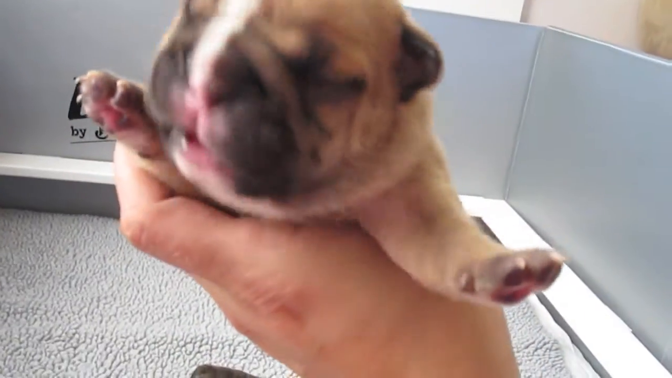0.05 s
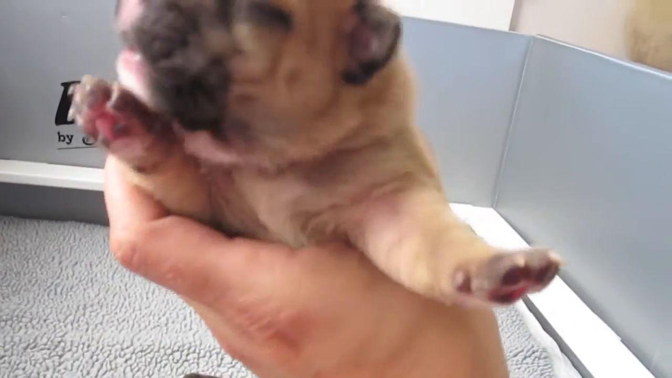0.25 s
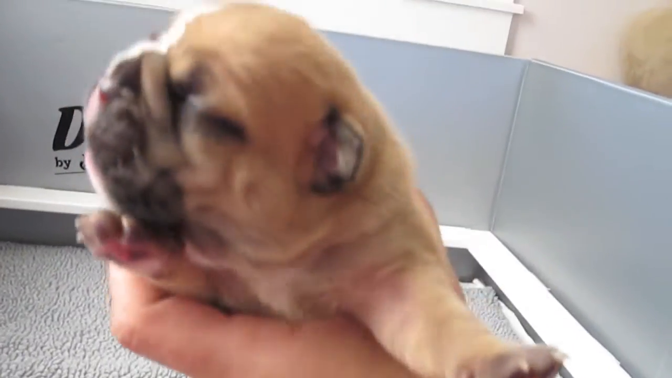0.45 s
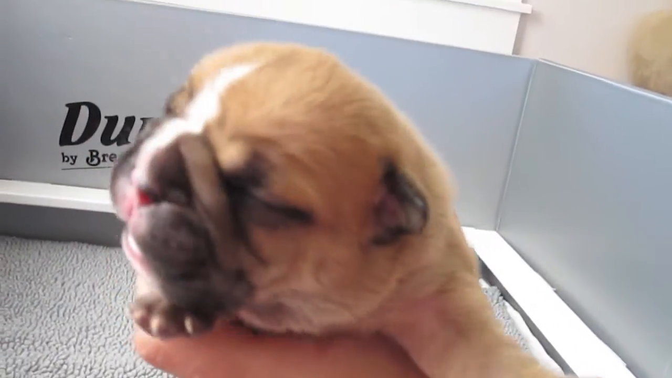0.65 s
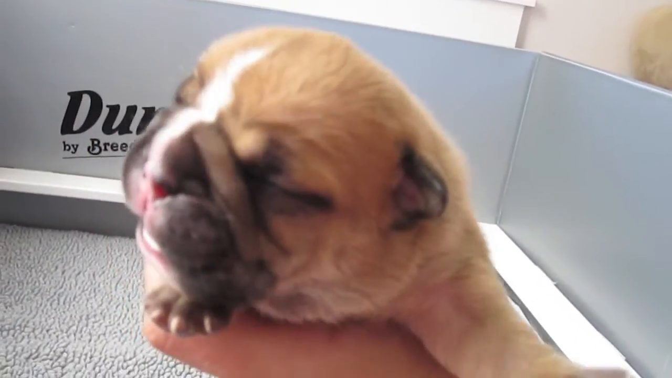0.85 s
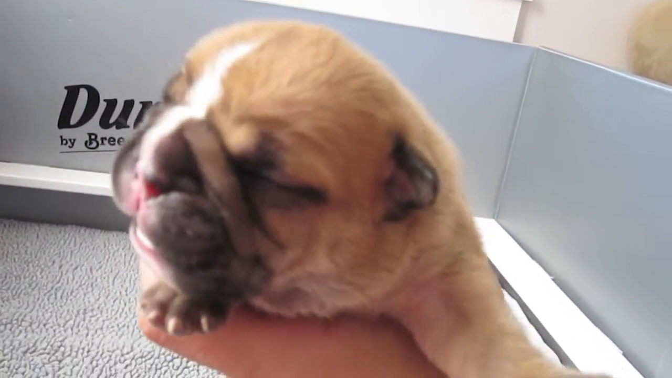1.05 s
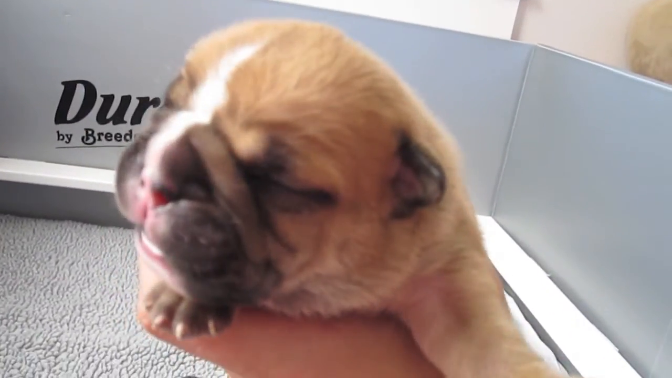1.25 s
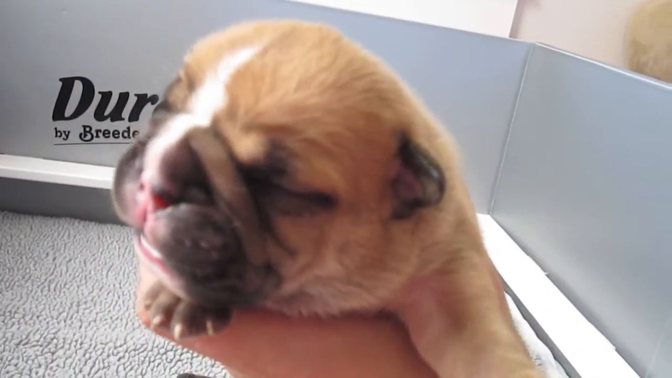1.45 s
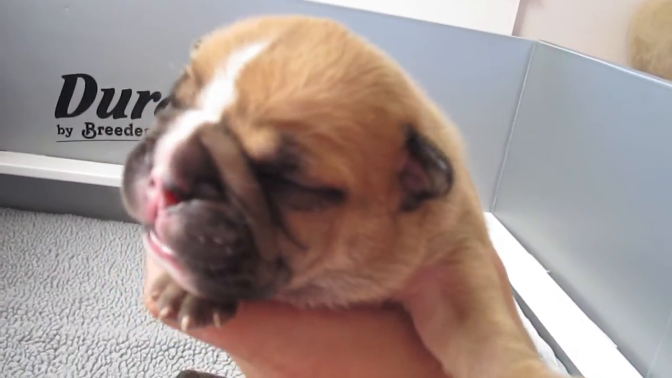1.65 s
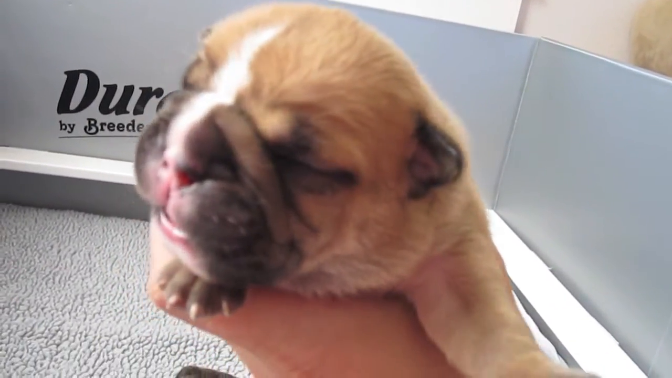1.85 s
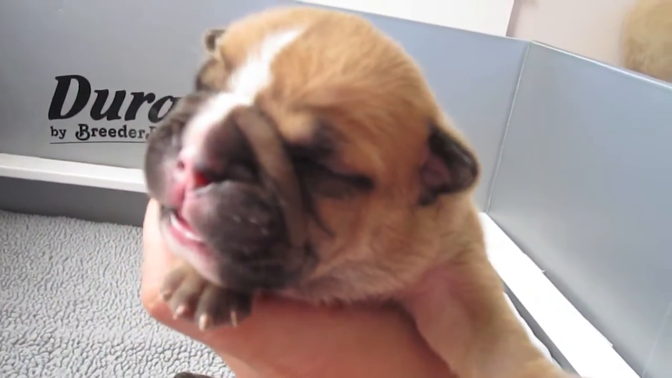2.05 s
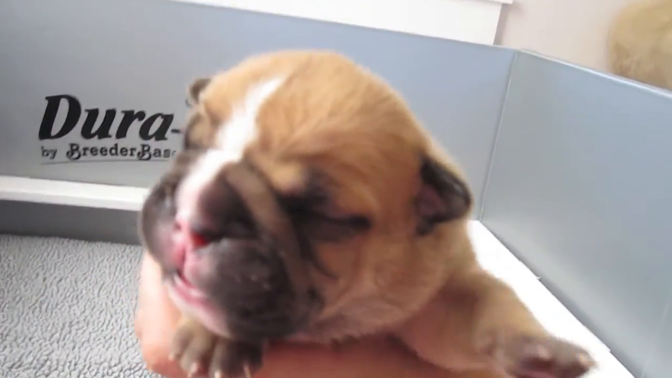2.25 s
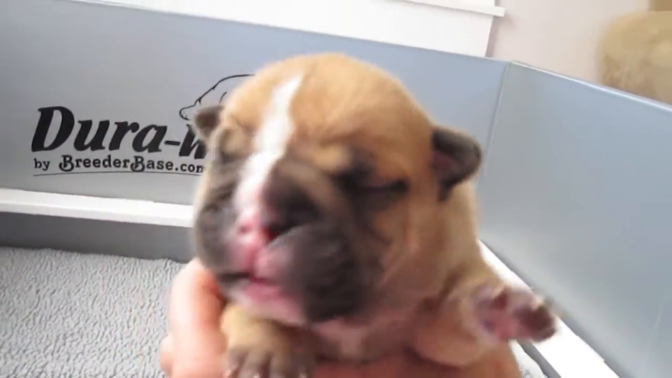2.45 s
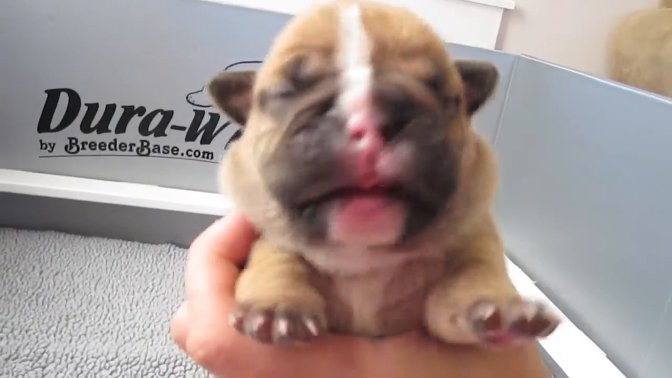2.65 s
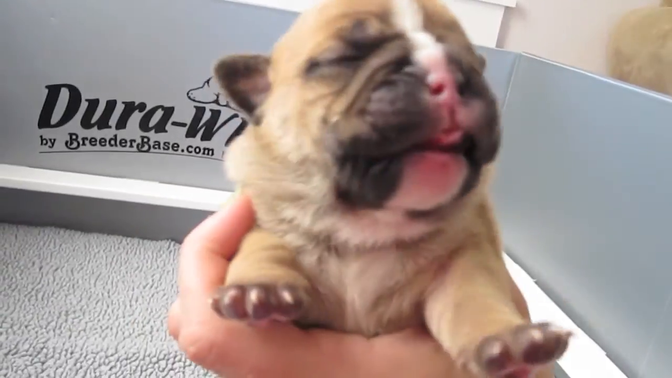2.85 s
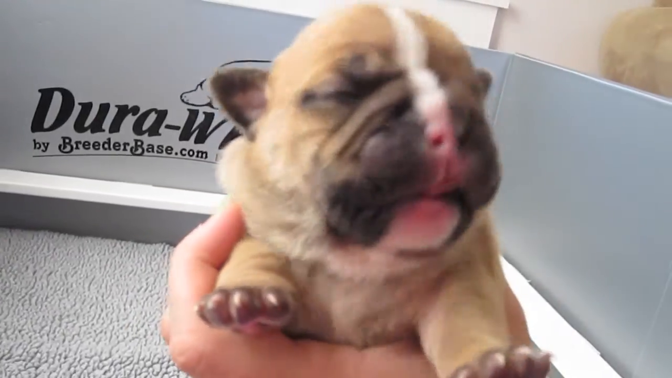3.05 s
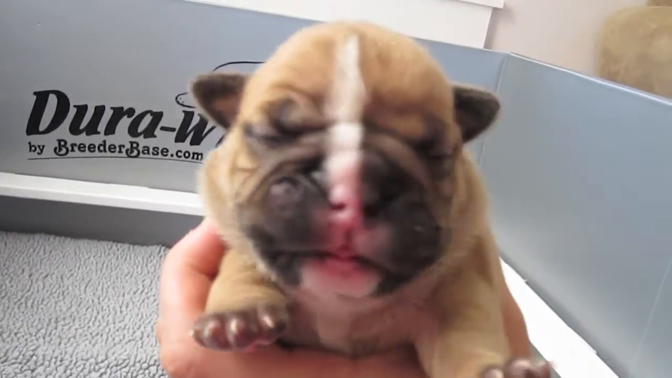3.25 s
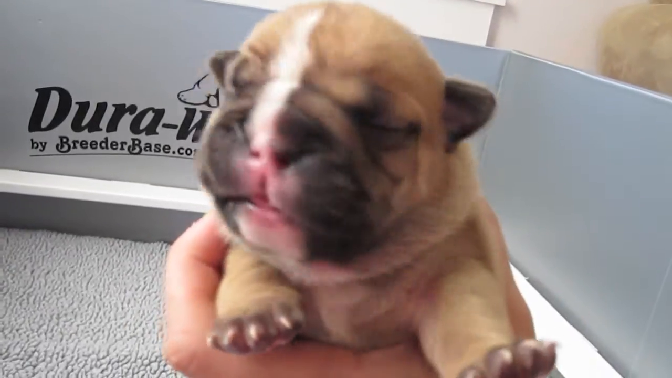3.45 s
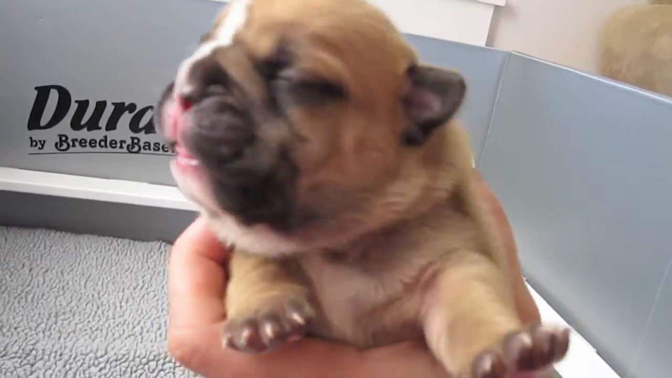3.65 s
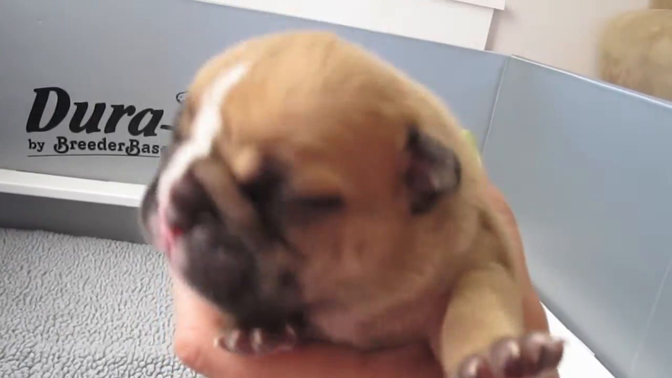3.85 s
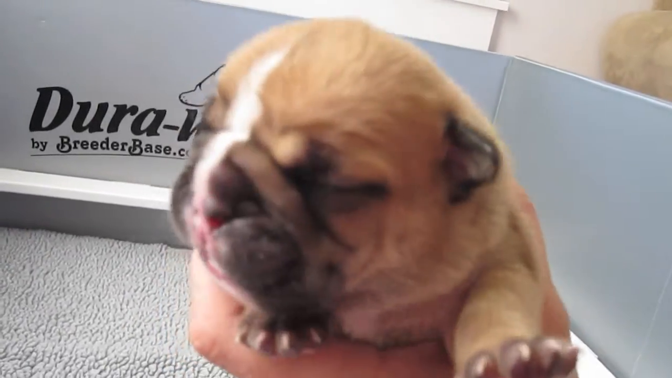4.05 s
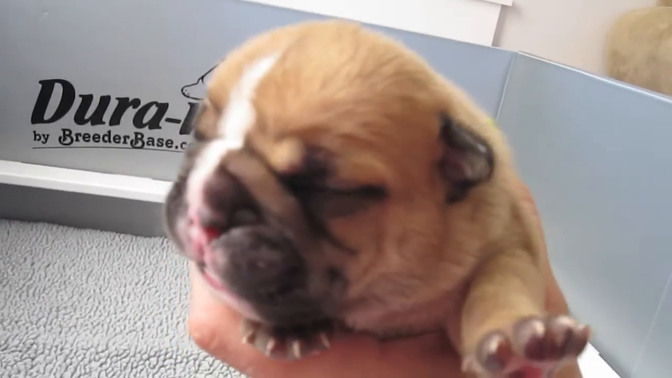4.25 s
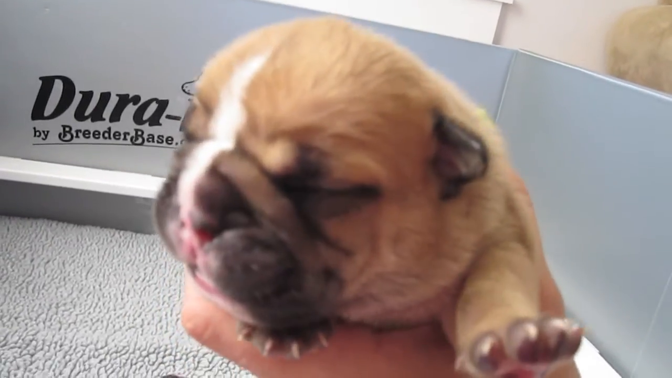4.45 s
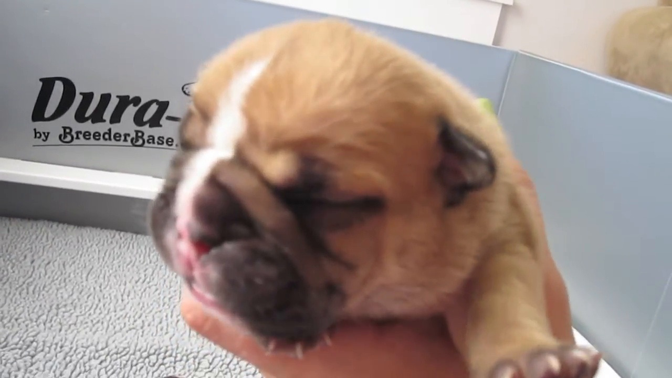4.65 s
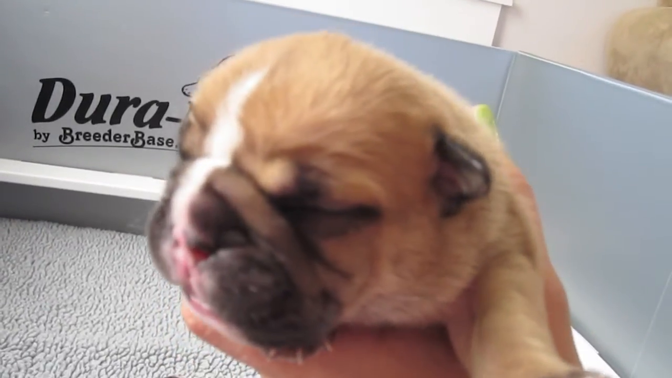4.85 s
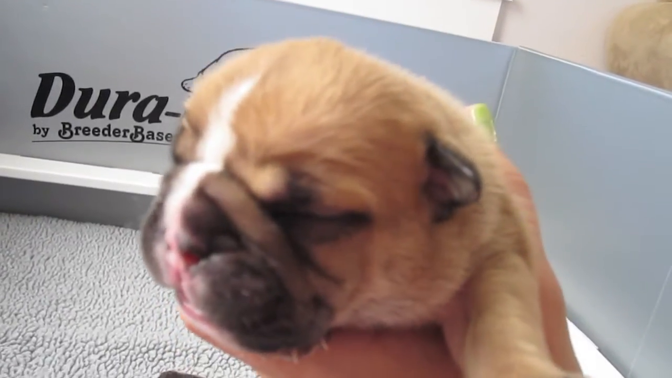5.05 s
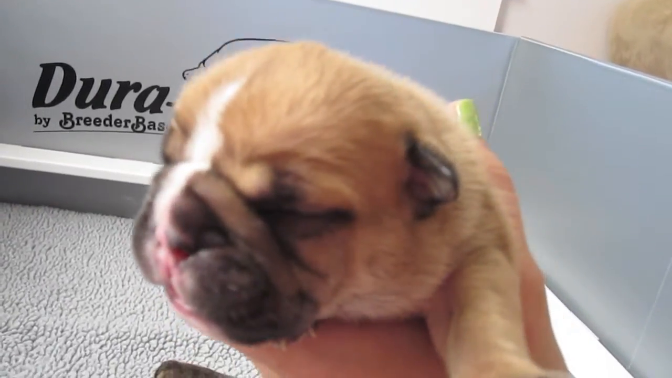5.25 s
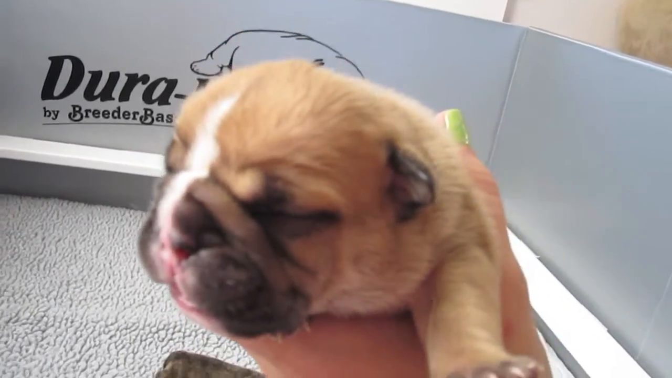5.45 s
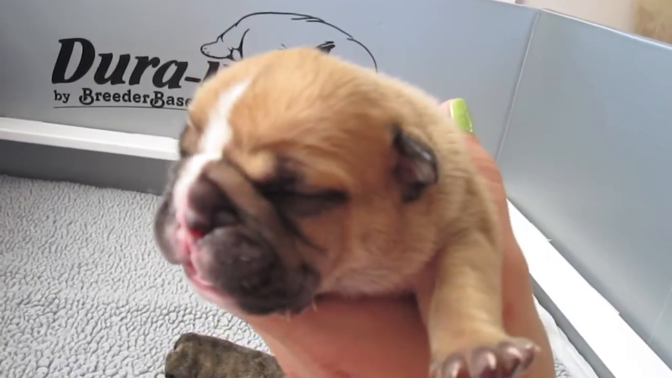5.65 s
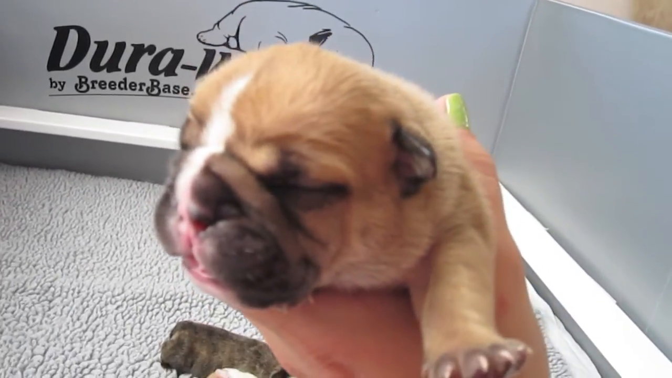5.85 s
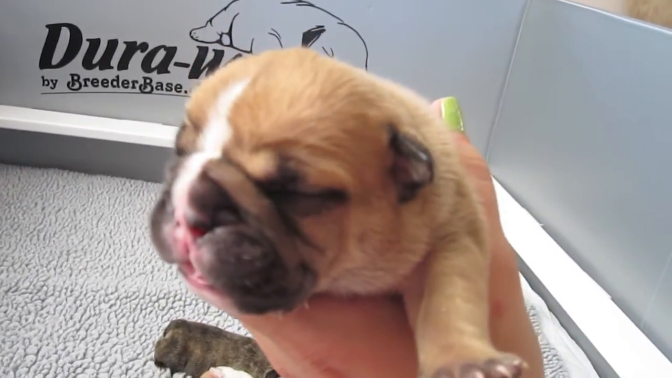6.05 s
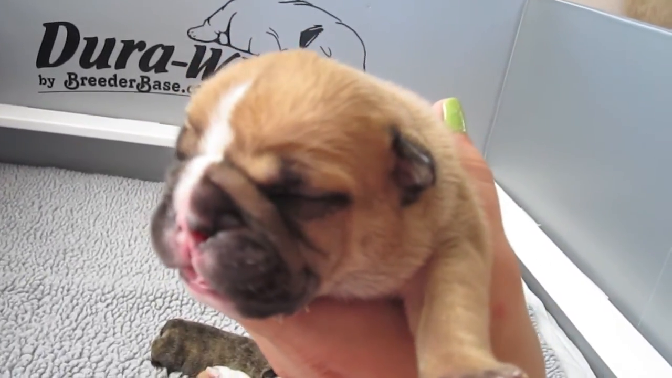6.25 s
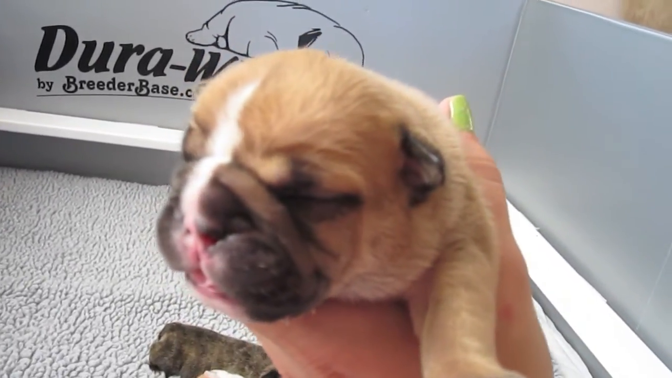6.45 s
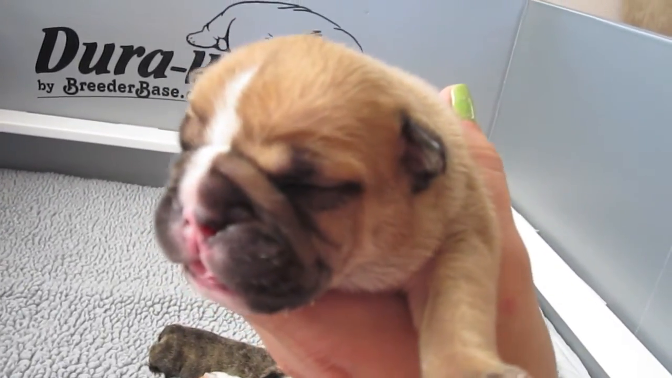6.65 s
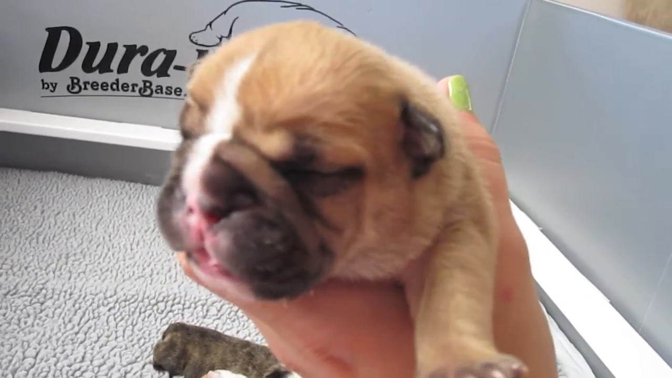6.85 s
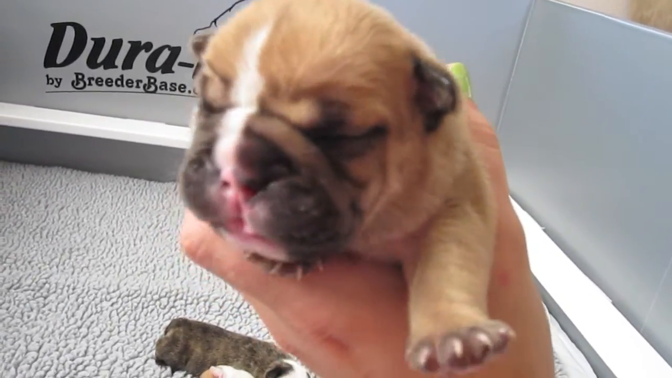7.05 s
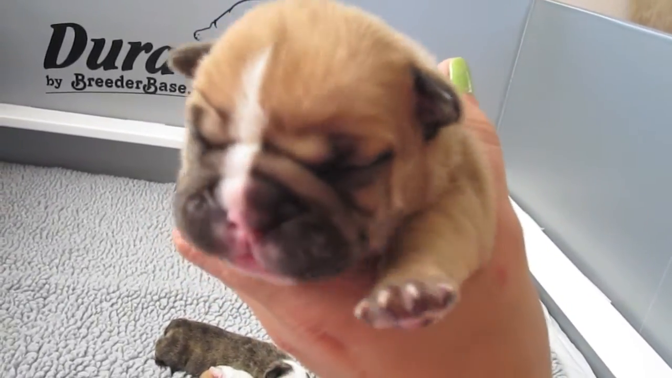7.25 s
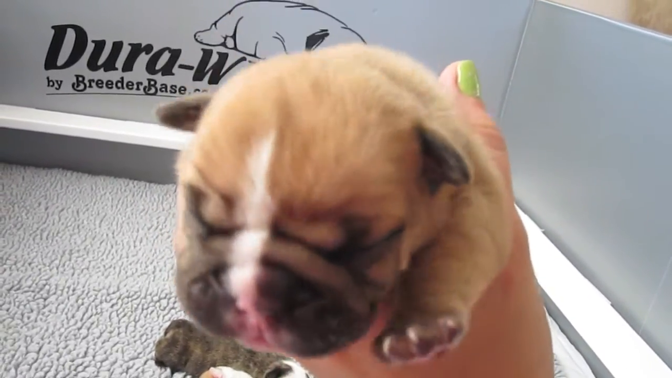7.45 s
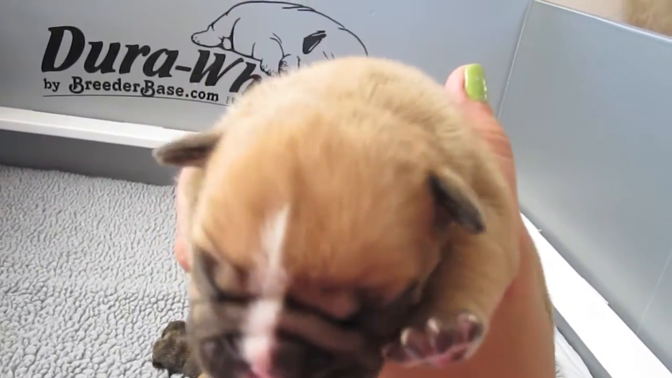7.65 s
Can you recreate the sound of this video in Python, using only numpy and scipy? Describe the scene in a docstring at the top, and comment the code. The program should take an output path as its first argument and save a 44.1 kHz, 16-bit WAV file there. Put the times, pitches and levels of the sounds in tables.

```python
"""A very young puppy cries close to the microphone, held in a hand over its whelping box in a small room.
Its vocal folds ring the throat in low whimpers that slide between a clear voice and a rasp, then flip up
into thin squeals and one loud scream; twice a second vibration of the folds joins in. From this close
its nose snuffles and its lips smack. Behind it are a short echo, ventilation hiss, a motor hum,
faint electronic whistles and the soft rumble of the hand."""
import sys
import numpy as np
from scipy import signal
from scipy.fft import rfft, irfft, next_fast_len
from scipy.io import wavfile
from scipy.ndimage import uniform_filter1d

SR = 44100
rng = np.random.default_rng(int(sys.argv[2]) if len(sys.argv) > 2 else 0)


def unload_audio(sound):
    """Save the sound as a 16-bit wav file, at the path given as the first command line argument."""
    columns = np.transpose(np.atleast_2d(sound))
    # keep every value between -1 and 1, then stretch to whole-number steps
    steps = np.round(np.clip(columns, -1, 1) * 32767)
    wavfile.write(sys.argv[1], SR, steps.astype(np.int16))


N = 340011
T = np.arange(N) / SR

# Pushes of the low voice. Each row: start, crest and end in seconds, the pitch at each in Hz, crest level,
# swell before it and sag after it in dB, roughness from 0 to 1, fundamental against each overtone at
# the folds in dB, low-band and high-band share of the whimper at the crest in dB.
WHIMPERS = [ (0.0, 0.071, .12, 408, 400, 430, -49, 0, 7, 0.88, -9, -25, -12),
            (0.518, 0.626, .695, 413.3, 420, 378, -33, 10, 8.5, 0.63, -5, -12.5, -18.5),
            (0.916, 0.999, 1.022, 416, 432, 425, -35, 7, 14, 0.64, -6, -10.5, -21),
            (1.249, 1.39, 1.424, 412, 440, 414, -35, 9.5, 3.5, 0.78, -7, -11.5, -17),
            (1.656, 1.696, 1.735, 440, 416, 470, -35.5, 7.5, 6, 0.52, -12, -8, -17),
            (1.712, 1.749, 1.774, 427, 463, 495, -39, 2, 14, .15, -17, 3, -10),
            (1.77, 1.788, 1.799, 462, 440, 410, -35, 12, 3, 0.14, -17, 2, -8),
            (1.792, 1.806, 1.842, 428, 430, 570, -30.5, 14, 10.5, 0, -15, -8.5, -15.5),
            (1.835, 1.879, 1.91, 501, 502, 437, -33, 2.5, 12, 0, -16, -3.5, -17),
            (3.039, 3.131, 3.147, 466, 548, 572, -37, 11.5, 3.5, 0.11, 6.5, -2.5, -16.5),
            (3.143, 3.153, 3.166, 570, 600, 605, -39, 5, 3, 0, 12, 0.5, -0.5),
            (3.16, 3.187, 3.3, 595, 637, 650, -29, 8, 15.5, 0.07, 11, -16.5, -15.5),
            (4.261, 4.28, 4.341, 454.5, 446, 354, -31.5, 10, 9, .2, -3.5, -10.5, -18),
            (4.536, 4.609, 4.626, 286.3, 353, 360, -38, 8, 6, 0.46, 7, -8, -20),
            (4.872, 4.948, 4.974, 311, 347, 327, -33, 7, 14, 0.16, 2.5, -7, -24),
            (5.21, 5.273, 5.293, 287, 292, 350, -47, 5, 8, 0.58, 1, -3, -12),
            (5.56, 5.624, 5.643, 628, 730, 765, -41.5, 7.5, 4.5, .03, -6, -5, -22),
            (5.64, 5.672, 5.718, 719, 724, 880, -34, 6.5, 11.5, 0.02, 0, -7.5, -19),
            (6.066, 6.092, 6.12, 399, 430, 380, -48, 2, 0, 0.74, -7, -1.5, -6),
            (6.115, 6.136, 6.17, 706, 660, 590, -40.5, 4, 10, .05, 6, -6, -24),
            (6.165, 6.215, 6.236, 613, 650, 620, -46, 6, 7, 0.15, 4, -3.5, -14),
            (6.393, 6.43, 6.465, 408.5, 425, 410, -50.5, 4, 14, 0.84, -3, -3, -9),
            (6.683, 6.738, 6.762, 270, 282, 294, -43, 6, 10, 0.37, 11, -4.5, -10),
            (6.994, 7.051, 7.1, 397, 423, 410, -37.5, 11, 5.5, 0.44, -1, -9, -17),
            (7.289, 7.354, 7.388, 376, 425, 442, -32.5, 13, 7, 0.17, -0.5, -11.5, -13.5),
            (7.388, 7.4, 7.41, 351, 277, 295, -39.5, 9, 3, 0.33, -4, 1, -16),
            (7.596, 7.674, 7.716, 421, 656, 750, -33.5, 6.5, 9, 0.23, -5, -12.5, -11), ]
# Response of the throat and muzzle. Each row: frequency in Hz, gain in dB.
THROAT = [(150, -53), (350, -18.5), (550, -16), (720, -12), (880, -4.5), (1080, -0.5), (1300, 10),
          (1550, 1), (1850, -13.5), (2100, -13.5), (2650, -31.5), (3800, -37), (5500, -60), (9000, -70)]
# Brief weakenings of the voice. Each row: centre in seconds, depth in dB, half length in seconds.
CATCHES = [(0.593, 2.5, .008), (0.651, 5.5, .008), (1.342, 2, .015), (2.749, 4.5, .006), (2.829, 16, .004),
           (2.875, 8, .004), (2.893, 14, 0.0033), (3.403, 2, .006), (3.567, 0, .012)]
# Spectrum of the ventilation. Each row: frequency in Hz, relative level in dB.
AIR_SPECTRUM = [(20, -5), (55, -2.5), (105, 1), (165, -4.5), (350, 0.5), (560, -3.5), (1000, -4.5),
                (1600, -3), (2400, -10), (3300, -9), (4400, -14), (6000, -17), (8400, -19.5),
                (11500, -23.5), (15000, -29.5)]
# Hollow resonances in that air. Each row: frequency in Hz, width in Hz, lift in dB.
AIR_PEAKS = [(890, 64, 3.5), (1300, 170, 5.5), (1530, 123, 8), (1849, 103, 7), (2164, 170, 4.5),
             (2444, 95, 6.5), (2756, 68, 5), (3820, 87, 5), (9130, 330, 4)]
# Rumble of the hand holding the puppy. Each row: time in seconds, level in dB.
HANDLING = [(1.1, -59.5), (1.8, -64.5), (3, -70), (4.4, -68), (5.1, -75)]
# Tones of a motor in the room. Each row: frequency in Hz, level in dB.
HUM_TONES = [(98.2, -66), (370, -71)]
# Thin whistles of electronics. Each row: frequency in Hz, level in dB.
WHISTLES = [(6132, -74), (7867, -64.5)]
# Calls of the high voice. Each row: start, crest and end in seconds, the pitch at each in Hz, crest level
# at the folds, swell before it and sag after it in dB, final drop as a share of the pitch.
SQUEALS = [ (0.217, 0.262, .298, 1066, 1090, 1010, -42.5, 2.5, -2.5, .09),
           (2.138, 2.161, 2.202, 1077, 1075, 1190, -37.5, 2, 1.5, 0),
           (2.199, 2.232, 2.265, 1202, 1186, 1250, -37.5, 1, 1, 0.0093),
           (2.264, 2.278, 2.35, 1227, 1270, 1410, -36, 3, 2, .17),
           (2.654, 2.68, 2.696, 1462, 1520, 1450, -36, 2.5, -2, 0.054),
           (2.694, 2.785, 2.924, 1394, 1404, 1470, -33, -1.5, 1, 0.32),
           (2.99, 2.992, 3.004, 1252, 1247, 1230, -31.5, -6, 0.5, 0.096),
           (3.321, 3.477, 3.604, 1423, 1390, 1430, -33, 0.5, 1, 0.2), ]
# Extra tones within squeals. Each row: start and end in seconds, ratio to the squeal's pitch, level in dB.
SIDE_TONES = [(2.237, 2.34, 1.52, -52.5), (2.747, 2.767, 1.52, -45.5), (2.82, 2.836, 1.54, -43),
              (2.875, 2.913, 1.54, -44), (3.39, 3.475, 1.51, -44)]
# Clicks of lips and tongue. Each row: start in seconds, peak in dB, ring in Hz, 60 dB decay in seconds.
SMACKS = [(2.463, -36, 1098, 0.018), (2.698, -33, 1181, 0.0042), (3.016, -30.5, 1110, 0.0078),
          (3.52, -25, 1371, 0.015), (3.739, -28.5, 1370, 0.013), (4.242, -34.5, 1130, 0.014),
          (4.843, -33, 3020, 0.028), (5.463, -37.5, 3800, 0.013), (5.514, -41, 2070, 0.0065),
          (5.716, -35.5, 1180, 0.0053), (6.203, -34, 1400, 0.011), (6.432, -38, 3400, .012),
          (6.71, -38, 3500, .01), (6.748, -38, 3730, 0.012), (7.411, -25, 1110, 0.0087),
          (7.4118, -26.5, 2460, 0.018)]
# Breaths through the nose. Each row: centre and length in seconds, level in dB, upper band edge in Hz.
SNUFFLES = [(3.022, 0.037, -53, 7000), (3.527, 0.064, -54.5, 6500), (4.053, 0.031, -48, 7000),
            (4.586, 0.044, -50, 5960), (4.878, 0.15, -50.5, 4250), (6.447, 0.04, -52, 3500)]
# A second vibration of the folds, one curve for each time it joins. Each row: time in seconds,
# pitch in Hz, level at the folds in dB, step from one harmonic to the next in dB.
UNDERTONES = [
    [(3.476, 1055, -41, -8), (3.49, 932, -30.5, 0), (3.517, 898, -27, 0), (3.53, 897, -40, -10)],
    [(3.83, 914.2, -39, -10), (3.86, 700, -42.5, -0.5), (3.925, 918.3, -30.5, -5), (3.97, 800, -38, 2),
     (4.002, 743, -35, 7), (4.048, 681, -36, -5)],
]
# Course of the scream. Each row: time in seconds, pitch in Hz, levels of fundamental and octave in dB.
SCREAM = [(3.74, 844.4, -45, -48), (3.776, 1033, -33, -45), (3.808, 1144, -21.5, -35.5),
          (3.83, 1221, -20, -36.5), (3.894, 1097, -26.5, -38), (3.928, 1090, -28.5, -43.5),
          (3.97, 1182, -23, -40), (3.978, 1241, -22, -45), (4.0, 1384, -20, -46), (4.016, 1453, -19.5, -46),
          (4.024, 1412, -29, -64), (4.046, 1405, -42, -65)]
# Strain in the scream. Each row: time in seconds, rasp as a factor, drive on the shrill resonances in dB.
STRAIN = [(3.79, .08, -44), (3.83, 0.13, -27.5), (3.86, 1, -27.5), (4.005, 0.16, -27), (4.035, 2.4, -37)]
# High resonances that only the scream excites. Each row: frequency in Hz, width in Hz, gain in dB.
SHRILL_RESONANCES = [(3600, 490, -29), (7080, 1900, -29.5), (8400, 370, -39), (10800, 1200, -36.5),
                     (14200, 1600, -40)]


def amp(db):
    """Decibels to gain."""
    return 10 ** (np.asarray(db) / 20)


def unit(x):
    """Scale to rms 1."""
    return x / np.sqrt(np.mean(x ** 2) + 1e-18)


def band(x, low_hz, high_hz, order=2):
    """Band-pass without delay."""
    sos = signal.butter(order, [low_hz, min(high_hz, .45 * SR)], "band", fs=SR, output="sos")
    return signal.sosfiltfilt(sos, x)


def spectrum_db(hz, points):
    """Read a spectrum of (Hz, dB) points at the given frequencies."""
    point_hz, db = np.transpose(points)
    return np.interp(np.log(hz), np.log(point_hz), db)


def colour(x, points):
    """Filter by a spectrum of (Hz, dB) points."""
    size = next_fast_len(len(x) + 2048)
    hz = np.maximum(np.fft.rfftfreq(size, 1 / SR), 1)
    return irfft(rfft(x, size) * amp(spectrum_db(hz, points)), size)[:len(x)]


def wobble(t, rate):
    """Random wandering through rate values a second, at rms 1."""
    knots = rng.standard_normal(4096)
    return unit(np.interp((t - t[0]) * rate, np.arange(len(knots)), knots))


def steady(x, window_s=0.014):
    """Even out slow level changes and keep the fast grain."""
    return x / np.sqrt(np.abs(uniform_filter1d(x ** 2, int(window_s * SR))) + 1e-14)


def controls(rows):
    """Sample times of a call and its columns at those times."""
    times, *columns = np.transpose(rows)
    t = np.arange(int(times[0] * SR) - 64, int(times[-1] * SR) + 64) / SR
    return [t] + [np.interp(t, times, column) for column in columns]


def arch(times, pitches):
    """Sample times of a call, and a pitch that bends smoothly through its start, crest and end."""
    t = np.arange(int(times[0] * SR), int(times[-1] * SR)) / SR
    parabola = np.polyfit(np.subtract(times, t[0]), pitches, 2)
    return t, np.polyval(parabola, t - t[0])


def add(out, t, sound):
    """Mix a sound in at its times, with soft ends."""
    inside = (t >= 0) & (t < (N - 1) / SR)
    ends = signal.windows.tukey(len(t), min(256 / len(t), 1))
    out[np.round(t[inside] * SR).astype(int)] += (sound * ends)[inside]


def partials(phase, levels_db):
    """Harmonics of a phase at the given rms levels."""
    return np.sqrt(2) * sum(amp(db) * np.sin(k * phase) for k, db in enumerate(levels_db, 1))


def folds(t, hz, jitter, rate):
    """Phase of vocal folds whose period wanders."""
    return 2 * np.pi * np.cumsum(hz * (1 + jitter * wobble(t, rate))) / SR


def catches(t):
    """How many dB the voice loses to its brief catches."""
    return sum(depth * np.exp(-((t - centre) / width) ** 2) for centre, depth, width in CATCHES)


def low_voice(t, hz, rough, fundamental_db, low_db, high_db):
    """Uneven fold pulses and puffs of air ring the throat; the tone shifts between three bands."""
    phase = folds(t, hz, jitter=0.0072 + 0.1445 * rough ** 1.29, rate=450)
    pulses = unit(amp(fundamental_db) * np.cos(phase) + sum(np.cos(k * phase) for k in range(2, 21)))
    pulses *= amp(3.3 * rough * wobble(t, rate=180))
    puffs = (1 + 0.85 * np.cos(phase)) * rng.standard_normal(len(t))
    voice = colour(pulses + 1.7 * rough ** 1.7 * puffs, THROAT)
    low = steady(band(voice, 250, 1080, order=6))
    middle = steady(band(voice, 1080, 1700, order=6))
    high = steady(band(voice, 1700, 9000, order=6))
    # Where the outer shares are large, the middle band briefly drops out, leaving a hollow tone.
    middle_share = np.sqrt(np.clip(1 - amp(low_db) ** 2 - amp(high_db) ** 2, .03, 1))
    return amp(low_db) * low + middle_share * middle + amp(high_db) * high


def whimpers(attack_s=0.006, release_s=0.0073, hoarse_onset=0.36, shake_db=0.6):
    """Each push swells and sags, hoarse at first and clearer later; a rough one also shakes in strength."""
    out = np.zeros(N)
    main_resonance = signal.iirpeak(1300, 3.5, fs=SR)
    for row in WHIMPERS:
        start, crest, end = row[:3]
        db, swell_db, sag_db, rough, fundamental_db, low_db, high_db = row[6:]
        t, hz = arch(row[:3], row[3:6])
        effort_db = np.interp(t, [start, crest, end], [-swell_db, 0, -sag_db])
        hoarse = np.clip(rough * np.interp(t, [start, end], [1 + hoarse_onset, 1 - hoarse_onset]), 0, 1)
        gate = np.clip(np.minimum((t - start) / attack_s, (end - t) / release_s), 0, 1)
        level_db = db + effort_db - catches(t) + shake_db * hoarse * wobble(t, rate=58.4)
        low_db = np.minimum(low_db - 0.88 * effort_db, 1)  # a weak voice leans to the outer bands
        high_db = high_db - 0.5 * effort_db
        cry = amp(level_db) * low_voice(t, hz, hoarse, fundamental_db, low_db, high_db)
        # All-pass: the main resonance holds each pulse a little longer than its neighbours do.
        held = 2 * signal.lfilter(*main_resonance, cry) - cry
        add(out, t, gate * held)
    return out


def room(x, t60_s=0.54, wet_db=-16, gap_s=.003, ring_db=4, ring_hz=1330):
    """Behind the close sound, scattered echoes off the box walls thicken into a short, ringing tail."""
    age = np.arange(SR // 2) / SR
    density = 0.025 + 4 * age
    echoes = rng.standard_normal(len(age)) * (rng.random(len(age)) < density) / np.sqrt(density)
    tail = echoes * amp(-60 * age / t60_s) * (age > gap_s)
    tail /= np.sqrt(np.sum(tail ** 2))
    ring = signal.lfilter(*signal.iirpeak(ring_hz, 3, fs=SR), tail)
    return x + amp(wet_db) * signal.fftconvolve(x, tail + (amp(ring_db) - 1) * ring)[:N]


def hand_rumble():
    """The hand that holds the puppy rumbles softly near the microphone."""
    rumble = band(rng.standard_normal(N + 2 * SR), 66, 230)[SR:-SR]
    return amp(np.interp(T, *np.transpose(HANDLING))) * unit(rumble)


def motor_hum():
    """A motor in the room hums on two slightly unsteady tones."""
    return sum(partials(2 * np.pi * hz * T + 0.23 * wobble(T, rate=11), [db]) for hz, db in HUM_TONES)


def ventilation(level_db=-49.8):
    """Room tone: a steady hiss of air, hollow with many small resonances."""
    hz = np.geomspace(20, 16000, 800)
    peaks_db = sum(lift / (1 + (2 * (hz - centre) / width) ** 4) for centre, width, lift in AIR_PEAKS)
    spectrum = np.column_stack([hz, spectrum_db(hz, AIR_SPECTRUM) + peaks_db])
    return amp(level_db) * unit(colour(rng.standard_normal(N), spectrum))


def electronic_whistles(flips_per_s=30):
    """Electronics give off faint, high tones whose phase flips at a steady rate."""
    flips = np.pi * uniform_filter1d(np.floor(flips_per_s * T), 64)
    return sum(partials(2 * np.pi * hz * T + flips, [db]) for hz, db in WHISTLES)


def high_voice(t, hz, db, tremble_db=0.87):
    """Tight folds give an almost pure, trembling tone, loudest on the throat's main resonance."""
    phase = folds(t, hz, jitter=0.0066, rate=450)
    octave_db = db + 3 - 7 * np.log2(hz / 1000)  # the overtone fades as the pitch climbs
    tone = partials(phase, [db + spectrum_db(hz, THROAT), octave_db + spectrum_db(2 * hz, THROAT)])
    return tone * amp(tremble_db * wobble(t, rate=82))


def squeals(attack_s=0.0032, overshoot=0.041, flip_s=0.0089, drop_s=0.0091, quaver=0.0033):
    """The pitch overshoots as the voice flips up, then bends, quavers and drops as the folds let go."""
    out = np.zeros(N)
    for row in SQUEALS:
        db, swell_db, sag_db, drop = row[6:]
        t, hz = arch(row[:3], row[3:6])
        age, left = t - t[0], t[-1] - t
        bend = overshoot * np.exp(-age / flip_s) - drop * np.exp(-(left / drop_s) ** 2)
        hz = hz * (1 + bend + quaver * wobble(t, rate=36.6))
        effort_db = np.interp(t, row[:3], [-swell_db, 0, -sag_db]) - catches(t)
        attack = np.minimum(age / attack_s, 1)
        add(out, t, attack * high_voice(t, hz, db + effort_db) + side_tones(t, hz))
    return out


def side_tones(t, hz):
    """As alternate cycles of a squeal grow unequal, a tone swells at about 1.5 times its pitch."""
    out = np.zeros(len(t))
    for start, end, ratio, db in SIDE_TONES:
        swell = np.sin(np.pi * np.clip((t - start) / (end - start), 0, 1))
        out += swell * partials(folds(t, ratio * hz, jitter=0.0059, rate=140), [db])
    return out


def lip_smacks():
    """Lips and tongue make wet clicks, each a fast-dying burst in a band of its own."""
    out = np.zeros(N)
    age = np.arange(-512, 2048) / SR
    for start, db, hz, decay_s in SMACKS:
        burst = rng.standard_normal(len(age)) * (age >= 0) * amp(-60 * np.abs(age) / decay_s)
        click = band(burst, hz * .6, hz * 1.45, order=4)
        add(out, start + age, amp(db) * click / np.abs(click).max())
    return out


def snuffles():
    """Air hisses through the nose in short breaths."""
    out = np.zeros(N)
    for centre, length, db, top_hz in SNUFFLES:
        swell = np.exp(-2 * (1.46 * (T - centre) / length) ** 2)
        hiss = unit(band(rng.standard_normal(N), 0.057 * top_hz, top_hz, order=1))
        out += amp(db) * swell * hiss
    return out


def undertones(shudder_db=1.4):
    """A second, looser vibration of the folds shudders beneath the high voice, through the same throat."""
    out = np.zeros(N)
    for curve in UNDERTONES:
        t, hz, db, tilt_db = controls(curve)
        levels_db = [db + tilt_db * k + spectrum_db((k + 1) * hz, THROAT) for k in range(3)]
        tone = partials(folds(t, hz, jitter=0.013, rate=400), levels_db)
        add(out, t, tone * amp(shudder_db * wobble(t, rate=200)))
    return out


def shrill_db(hz):
    """An overtone flares as it glides through a high resonance and is dark in between."""
    gain = sum(amp(db) / (1 + ((hz - centre) / width) ** 2) ** 3 for centre, width, db in SHRILL_RESONANCES)
    return 20 * np.log10(1e-4 + gain)


def scream(flicker_db=3):
    """Pressed hard, the folds slap shut and excite shrill resonances; strain makes them flutter and rasp."""
    out = np.zeros(N)
    t, hz, db, octave_db = controls(SCREAM)
    phase = folds(t, hz, jitter=0.0048, rate=146.4)
    times, *columns = np.transpose(STRAIN)
    strain, drive_db = (np.interp(t, times, column) for column in columns)
    overtones_db = [drive_db + shrill_db(k * hz) + flicker_db * wobble(t, rate=72.7) for k in range(3, 15)]
    rasp = strain * amp(db - 19) * unit(band(rng.standard_normal(len(t)), 1300, 1950))
    flutter = 1 + 0.039 * strain * wobble(t, rate=1200)
    add(out, t, partials(phase, [db, octave_db] + overtones_db) * flutter + rasp)
    return out


def scene():
    """One microphone close to the puppy, with the echo and the room tone well behind it."""
    puppy = snuffles() + lip_smacks() + whimpers() + squeals() + scream() + undertones()
    return (room(puppy) + hand_rumble() + motor_hum() + ventilation() + electronic_whistles())[None]


def record(dry):
    """The recorder cuts the top steeply at 15750 Hz."""
    return signal.sosfiltfilt(signal.ellip(10, .1, 60, 15750, fs=SR, output="sos"), dry)


dry = scene()
out = record(dry)
unload_audio(out)
```